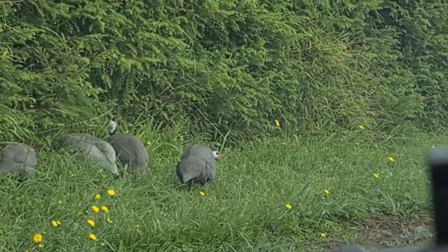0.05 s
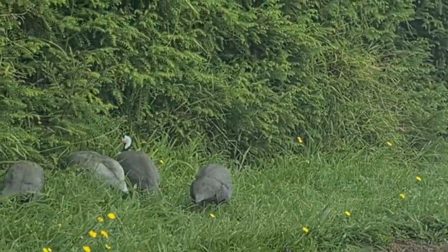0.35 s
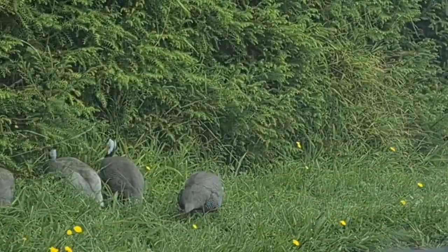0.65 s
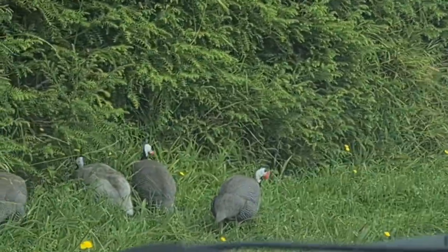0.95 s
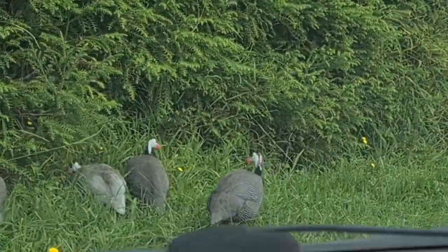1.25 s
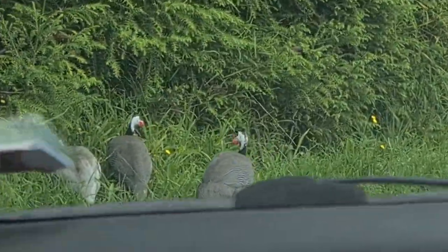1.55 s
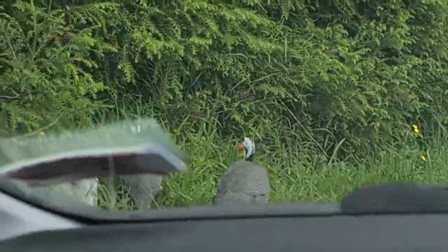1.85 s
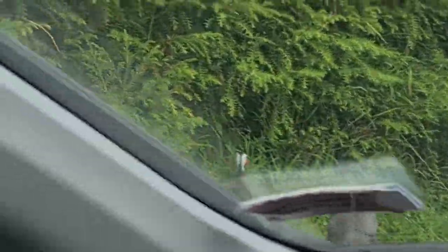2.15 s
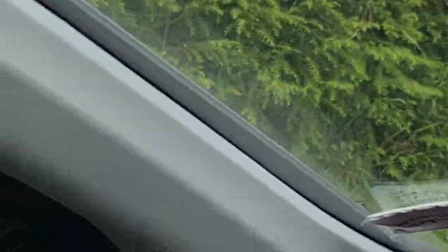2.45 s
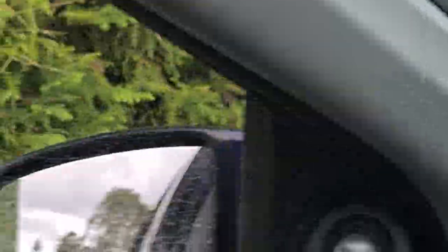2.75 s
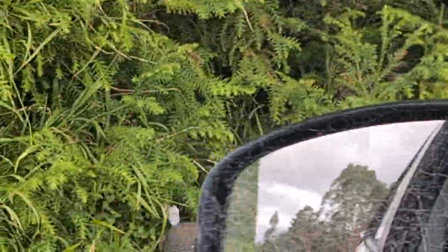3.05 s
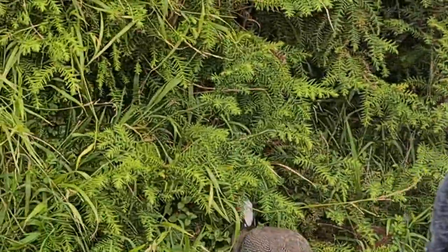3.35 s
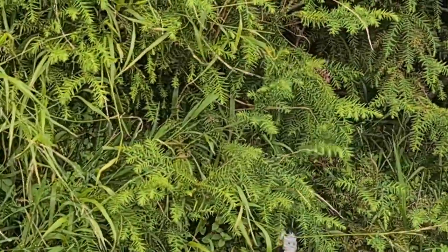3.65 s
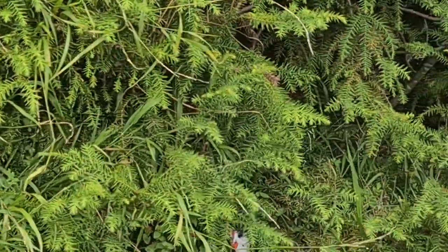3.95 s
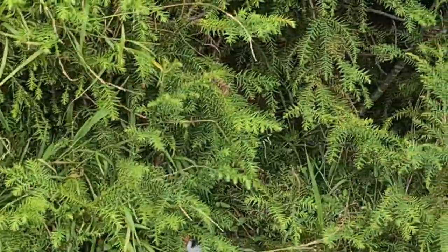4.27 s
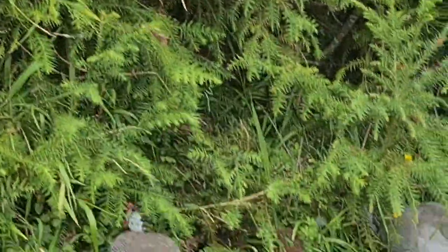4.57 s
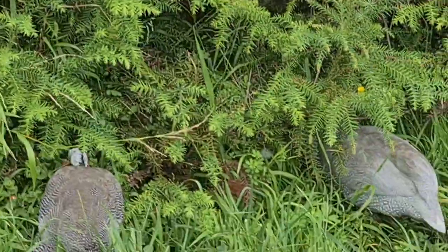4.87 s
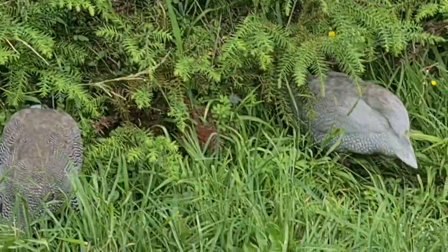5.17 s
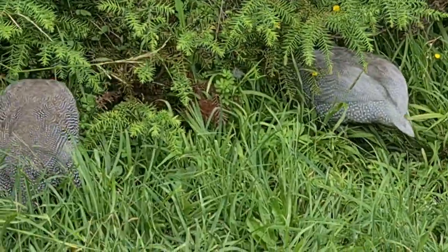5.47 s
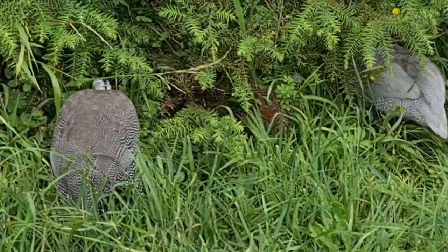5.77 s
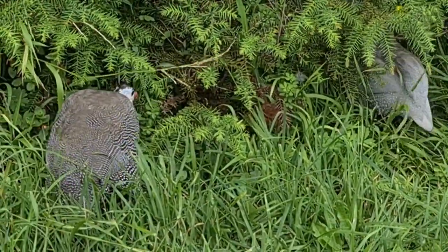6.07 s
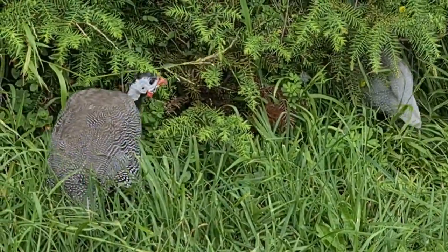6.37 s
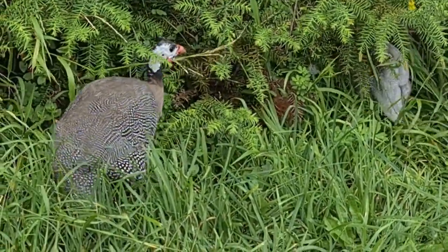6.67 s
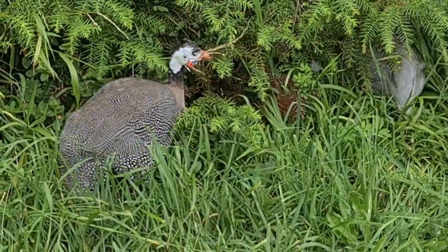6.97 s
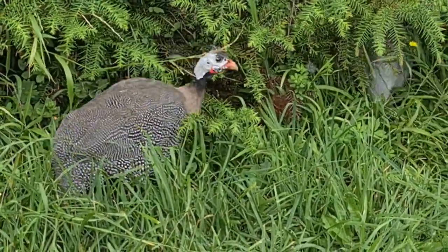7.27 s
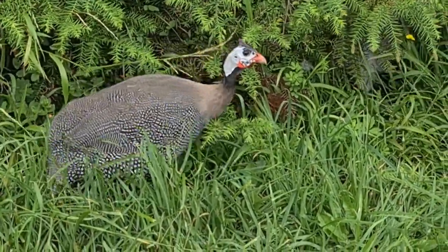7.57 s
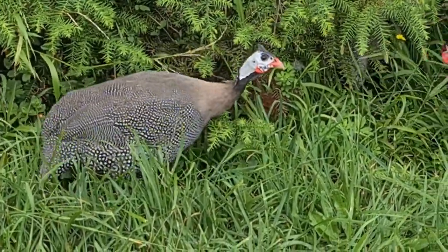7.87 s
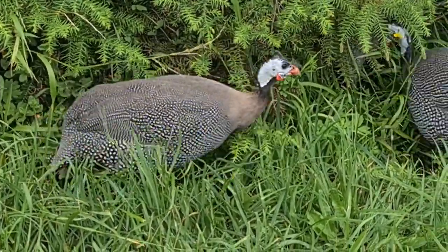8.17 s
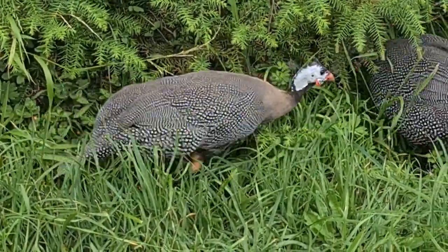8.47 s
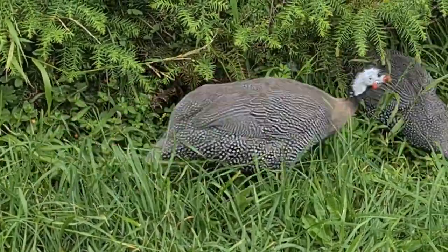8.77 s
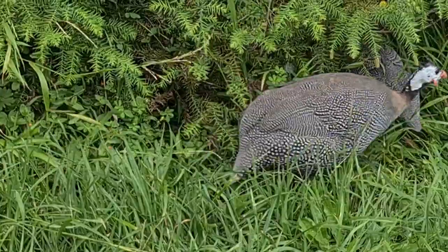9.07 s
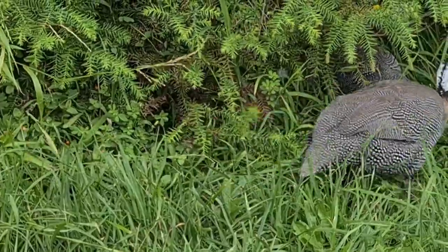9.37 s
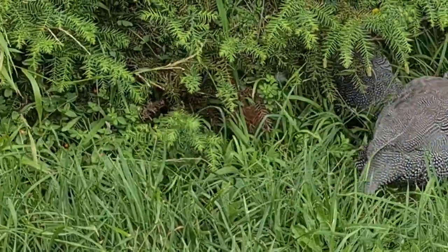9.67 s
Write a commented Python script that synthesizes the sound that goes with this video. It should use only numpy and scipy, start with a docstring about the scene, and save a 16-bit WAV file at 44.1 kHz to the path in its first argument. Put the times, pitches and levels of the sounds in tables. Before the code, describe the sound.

Guinea fowl give short, high clucks, whistles and buzzy trills over the low drone of a car slowing to an idle.

```python
"""Guinea fowl forage along a hedge, heard through the open window of a car that rolls to a stop and idles.
The syrinx of each bird is a modulated oscillator, giving arched clucks, thin whistles, buzzy trills
and hoarse sweeps, which the hedge reflects. Harmonics of the engine's firing rate drone in the cabin;
trim clicks, something squeaks, and blows on the body set the cabin air booming. Tyre noise and sway
fade as the car slows, and grass rustles faintly over a steady rumble and the open air."""
import sys
import numpy as np
from scipy import signal
from scipy.fft import rfft, irfft, next_fast_len
from scipy.io import wavfile
from scipy.ndimage import map_coordinates

SR = 44100
rng = np.random.default_rng(int(sys.argv[2]) if len(sys.argv) > 2 else 0)


def to_wav(sig):
    """Store sig (one row per channel, or 1-D mono) as 16-bit WAV at the path in sys.argv[1].

    Samples outside -1..1 are clipped; the rate is SR.
    """
    pcm = np.clip(np.atleast_2d(sig), -1, 1) * 32767
    pcm = np.round(pcm).astype(np.int16)
    wavfile.write(sys.argv[1], SR, pcm.T)  # frames by channels


N = 433062

# pitch arches: apex_s, fall_s, top_hz, end_hz, rise_db, accent_db, undertone_db, rasp_fraction
CLUCK_CALLS = [(1.755, 0.013, 4200, 3078, -61, -19, -52, 0), (2.800, 0.014, 4420, 3296, -37, -13, -60, .12),
               (3.174, .015, 3785, 2846, -54, -24, -32.5, 0.33),
               (3.375, .015, 4270, 3100, -41.5, -20, -58, 0),
               (4.041, 0.014, 4452, 3125, -37.5, -22.5, -66.5, 0.12),
               (4.668, 0.013, 4239, 3263, -34, -11, -23, 0.29),
               (5.450, 0.01, 3850, 2800, -41.5, -32, -47, 0.7),
               (6.008, .014, 4380, 3360, -36, -11, -34.5, 0.64),
               (6.396, .0164, 4270, 2950, -37, -24.5, -70, .25),
               (6.981, 0.014, 3650, 3360, -31, -36, -76, 0),
               (7.312, .016, 3906, 2740, -26.5, -18, -60, 0.1),
               (8.211, 0.011, 4292, 3063, -37, -19, -63, 0),
               (9.796, .0113, 3900, 2963, -54.5, -27.5, -69.5, 0)]
# contact notes: start_s, length_s, level_db, start_hz, one_third_hz, two_thirds_hz, end_hz
WHISTLE_CALLS = [(1.124, 0.036, -44.5, 3760, 3900, 3883, 4030), (2.0, .125, -53, 2877, 2890, 2830, 2940),
                 (3.198, 0.13, -48, 2840, 2870, 2860, 3000), (4.447, 0.12, -49.5, 3020, 3030, 3080, 3066),
                 (5.163, 0.2, -44, 1860, 2340, 2206, 2310), (5.165, 0.089, -64, 5450, 5530, 5520, 5540),
                 (5.441, 0.058, -47, 3780, 3900, 3840, 3840), (6.377, 0.047, -29, 2270, 2470, 2620, 2842),
                 (7.325, 0.071, -46, 2710, 2700, 2670, 2730), (9.465, .025, -48, 1980, 2030, 2050, 2030),
                 (9.505, 0.11, -39.5, 2340, 2408, 2473, 2360), (9.555, .0334, -52, 3000, 3350, 3300, 3200)]
# buzzy calls: start_s, length_s, centre_hz, trill_rate_hz, level_db
TRILL_CALLS = [(.01, 0.067, 3780, 170, -54.5), (0.54, .1, 4000, 170, -61), (0.705, 0.087, 3680, 171, -45),
               (0.765, 0.11, 3620, 173, -47.5), (2.16, .2, 3570, 169, -50),
               (2.487, 0.087, 3510, 220, -37.5), (3.262, .056, 3570, 170, -54),
               (3.574, 0.34, 3840, 172, -54), (5.152, .133, 3640, 168.5, -53),
               (5.592, 0.078, 3680, 161, -36), (7.572, 0.072, 3160, 249.4, -31)]
# soft calls that flick up or down: start_s, length_s, from_hz, to_hz, level_db
SWEEP_CALLS = [(1.232, 0.02, 3870, 2782, -46), (1.281, 0.051, 4220, 2750, -43),
               (1.520, .0304, 3997, 2620, -48.5), (1.961, .0287, 2590, 5200, -38.5),
               (1.983, 0.02, 4980, 2520, -38.5), (2.316, .016, 2400, 4700, -47),
               (3.021, 0.037, 2510, 4810, -41.5), (3.062, .0215, 4251, 3149, -44),
               (3.121, 0.021, 2768, 4414, -49.5), (4.345, 0.064, 4880, 3694, -50.5),
               (7.263, .0461, 2430, 5180, -34.5), (8.482, 0.024, 2210, 4576, -25),
               (8.528, .0109, 4410, 2490, -35), (9.612, 0.029, 2360, 5110, -33),
               (9.643, 0.015, 4700, 2266, -29.5)]
# resonance of the throat and bill: frequency_hz, gain_db
BILL_RESONANCE = [(2000, -25), (2600, -5.5), (3200, 3), (3900, -6), (4500, -7), (5200, -15.5)]
# reverberation of the hedge: frequency_hz, t60_s
HEDGE_DECAY = [(300, .15), (3000, 0.27), (10000, 0.059)]
# engine speed: time_s, firing_rate_hz
ENGINE_SPEED = [(0, 29.17), (1.1, 28.5), (2, 25.3), (3.4, 23.56), (5.4, 23.47), (6.9, 23.95), (7.5, 25.11),
                (8.3, 23.83), (9.82, 23.68)]
# shaking of the car by the first engine order: firing_rate_hz, level_db
SHUDDER_LEVELS = [(23.5, -33.5), (24.2, -37), (25, -25), (26, -23.5), (28, -18), (29.5, -21)]
# cabin drone: time_s, second_order_db, higher_orders_db
DRONE_LEVELS = [(0, -23.5, -32.5), (2, -26.5, -30), (4.5, -26, -26), (6.6, -23, -24.5), (7.6, -22, -27.5),
                (8.4, -22, -21), (9.82, -21.5, -21)]
# higher engine harmonics: order, relative_db
HIGHER_ORDERS = [(3, -11), (4, -25.5), (5, -23), (6, -18.5), (7, -25.5), (8, -27.5), (9, -34), (10, -38),
                 (15, -37)]
# engine whines: pitch_hz, relative_db
WHINE_TONES = [(1062, -1), (4900, -15.5)]
# motion of the slowing car: time_s, motion_db
CAR_MOTION = [(0, -3), (1.2, -0.5), (2.9, -4), (3.7, -11.5), (5.4, -15.5)]
# blows on the body: start_s, level_db, boom_hz, panel_relative_db
BODY_BLOWS = [(1.525, -23, 245, 0), (1.565, -13, 91.4, -10.5), (1.605, -19, 192, -13), (5.435, -12, 76, -1),
              (5.460, -6, 59.9, -8)]
# clicks of the trim: start_s, level_db, knock_relative_db, snap_relative_db
TRIM_CLICKS = [(1.0743, -20.5, -12, -7.5), (2.521, -37, -10, -0.5), (3.4128, -28, 8.5, -9),
               (3.4964, -32, 16, -40), (5.6146, -52.5, 20.5, 6.5), (6.2706, -41.5, 6.5, -25),
               (6.9159, -44, 12, -26), (9.0256, -42, -5, 1)]
# partials of the squeak: pitch_hz, relative_db
SQUEAK_PARTIALS = [(1115, 3.5), (2290, -11.5), (3400, -13), (4000, -7.5), (5500, -23.5)]
# swells of rustling grass: middle_s, length_s, level_db
GRASS_BURSTS = [(1.193, .2, -62), (1.65, 0.29, -64.5), (2.354, .15, -70), (2.825, 0.14, -67.5),
                (4.382, 0.14, -65.5), (5.1, .12, -66), (5.7, 0.22, -68), (6.52, .2, -66),
                (6.88, 0.41, -67.5), (7.352, 0.18, -68.5), (7.716, 0.22, -69), (8.684, 0.068, -62),
                (8.873, 0.23, -58), (9.25, 0.39, -64.5)]
# noise spectra, each named for its source: frequency_hz, relative_db
SWAY_SPECTRUM = [(10, -20.5), (27, 5.5), (40, 7), (60, 9.5), (85, -5.5), (200, -36.5), (600, -120)]
TYRE_SPECTRUM = [(100, -14.5), (170, -1), (230, -4.5), (350, 1), (520, -13.5), (720, -8.5), (950, -17),
                 (1260, -16), (1600, -20.5), (4000, -46.5)]
PANEL_SPECTRUM = [(30, 5), (65, -4.5), (150, -4.5), (240, -13), (400, -16), (620, -19), (900, -36.5),
                  (1400, -40), (3000, -50), (8000, -95)]
GRASS_SPECTRUM = [(1500, -26.5), (4000, -3), (6800, 3), (8000, -2.5), (9500, 0.5), (12000, 0),
                  (15800, -4.5)]
CABIN_SPECTRUM = [(40, -28), (80, 3), (130, 4), (200, -16.5), (300, -19.5), (900, -79)]
AIR_SPECTRUM = [(120, -29.5), (200, -3.5), (268, -5.5), (366, -5.5), (447, -9), (788, -15), (945, -21.5),
                (1070, -19.5), (1700, -24.5), (4810, -27.5), (7190, -39.5), (8020, -53), (9280, -41.5),
                (14700, -53), (15800, -53)]
KNOCK_SPECTRUM = [(100, -38), (400, 3), (1000, 0.5), (1800, -34), (5000, -77.5)]
TICK_SPECTRUM = [(700, -32), (1400, -3), (1700, -9.5), (2100, 1.5), (2600, -4.5), (4500, -17.5),
                 (8000, -38)]
SNAP_SPECTRUM = [(1000, -34), (3500, 11.5), (6000, 4), (7800, -1), (8700, 5.5), (11000, -5.5),
                 (15000, -10)]
SCRAPE_SPECTRUM = [(900, -17), (2300, -2), (3500, 0), (5600, -15), (7000, -34.5)]
# likeness of left and right noise: frequency_hz, correlation
STEREO_COHERENCE = [(60, 0.99), (150, 0.9), (300, 0.68), (1000, 0.056), (4000, 0.054), (10000, 0.039)]
# uneven treble with a dip at 8 kHz: frequency_hz, gain_db
TREBLE_COLOUR = [(5000, 1.5), (6000, 7), (7000, -1), (7500, -2.5), (8000, -12), (8600, 3), (10000, -0.5)]


def clucks(rise_s=0.0145, start_hz=3297, hold_s=0.0018, release_s=0.0084, break_s=0.0061, dip_db=3,
           scatter_hz=650, shake_db=1.8, second_db=-20.5, third_db=-38, upper_ratio=1.4,
           under_ratio=0.545):
    """Oscillation of the syrinx: the pitch arches, falls into an accent, then may break into a rasp."""
    out = np.zeros(N)
    for apex_s, fall_s, top_hz, end_hz, rise_db, accent_db, under_db, rasp in CLUCK_CALLS:
        fade_s = fall_s + hold_s
        t = np.arange(-rise_s * 1.4, fade_s + 3 * release_s, 1 / SR)
        up_hz = start_hz + (top_hz - start_hz) * np.cos(np.pi / 2 * t / rise_s)
        down_hz = end_hz + (top_hz - end_hz) * np.cos(np.pi / 2 * np.minimum(t / fall_s, 1)) ** 2
        top_db = (rise_db + accent_db) / 2 - dip_db - (top_hz - 4000) * 0.0069  # thinner as it climbs
        envelope = [(-rise_s * 1.3, rise_db - 23.5), (-rise_s * 0.5, rise_db), (0, top_db),
                    (fall_s * 0.55, top_db + 3.5), (fall_s * 0.82, accent_db), (fade_s, accent_db),
                    (fade_s + release_s, accent_db - 15), (t[-1], accent_db - 54)]
        level_db = np.interp(t, *np.transpose(envelope))
        broken = rasp * np.clip((t - fall_s) / break_s, 0, 1)
        jitter_hz = (90 + scatter_hz * broken) * wobble(1500, len(t))
        phase = phase_of(np.where(t < 0, up_hz, down_hz) + jitter_hz)
        bright_db = (level_db - accent_db) * 0.5 + 14 * (rasp - 0.3)  # a strained accent is brightest
        overtones = amp(second_db) * np.sin(2 * phase) + amp(third_db) * np.sin(3 * phase)
        # a faint upper tone follows the cluck's pitch at a fixed ratio
        upper = amp(-27 - (level_db + 22) * 0.34).clip(0, 0.5) * np.sin(upper_ratio * phase)
        voice = np.sin(phase) + amp(bright_db) * overtones + upper
        flutter = amp(shake_db * wobble(500, len(t))) * (1 + 1.6 * broken * wobble(2000, len(t)))
        crack = amp(under_db) * np.exp(-((t - fall_s - 0.01) / 0.008) ** 2)
        undertone = crack * np.sin(under_ratio * phase)  # the voice cracks nearly an octave down
        add(out, apex_s + t[0], amp(level_db) * voice * flutter + undertone)
    return out


def whistles(waver_hz=26, shake_db=3.2):
    """Near-pure tones glide through four pitches; random modulation makes them waver and break up."""
    out = np.zeros(N)
    for start_s, length_s, level_db, *pitches in WHISTLE_CALLS:
        progress = np.linspace(0, 1, int(length_s * SR))
        glide_hz = map_coordinates(np.array(pitches, float), [progress * 3], mode="nearest")
        tone = np.sin(phase_of(glide_hz + waver_hz * wobble(130, len(progress))))
        gain = amp(level_db + shake_db * wobble(90, len(progress)))
        add(out, start_s, gain * arch(progress) ** 0.5 * tone)
    return out


def trills(swing_scale_hz=537, roughness=0.18, uneven_db=2.5):
    """Fast frequency and amplitude modulation gives a soft tone sidebands, heard as a buzz."""
    out = np.zeros(N)
    for start_s, length_s, centre_hz, rate_hz, level_db in TRILL_CALLS:
        size = int(length_s * SR)
        beat = phase_of(rate_hz * (1 + 0.28 * wobble(100, size)))
        swing = 0.88 * np.sin(beat) + roughness * wobble(1182, size) + 0.48 * wobble(50, size)
        tone = np.sin(phase_of(centre_hz + swing_scale_hz * swing))
        gain = amp(level_db + uneven_db * wobble(70, size))
        swell = arch(np.linspace(0, 1, size) ** 0.69) ** 1.47
        add(out, start_s, gain * swell * (1 + 0.6 * np.cos(beat)) * tone)
    return out


def sweeps(hoarse_hz=180, shake_db=3.2, second_db=-27):
    """Source and filter: a hoarse glide is loudest where it crosses the resonance of the bill."""
    out = np.zeros(N)
    for start_s, length_s, from_hz, to_hz, level_db in SWEEP_CALLS:
        progress = np.linspace(0, 1, int(length_s * SR))
        pitch_hz = from_hz + (to_hz - from_hz) * progress
        phase = phase_of(pitch_hz + hoarse_hz * wobble(1488, len(progress)))
        gain = amp(level_db + along(BILL_RESONANCE, pitch_hz) + shake_db * wobble(474, len(progress)))
        voice = np.sin(phase) + amp(second_db) * np.sin(2 * phase)
        add(out, start_s, gain * arch(progress) ** 0.5 * voice)
    return out


def from_left(x, lead_s=0.00025, left_db=2.3):
    """Time and level cues to direction: the birds arrive earlier and louder on the left."""
    return filtered(x, lambda hz: np.exp(1j * np.pi * hz * lead_s * np.array([[1], [-1]]))) * pan(left_db)


def reflections(x, frame_db=-12, frame_t60_s=0.066, hedge_db=-24, echo_db=-29.5, echo_s=0.051):
    """Convolution adds early reflections off the window frame, a leafy tail and an echo from trees."""
    hz, t, spectra = signal.stft(rng.standard_normal((2, SR // 2)), SR, nperseg=256)
    hedge = signal.istft(spectra * decay(t, along(HEDGE_DECAY, hz)[:, None]), SR, nperseg=256)[1]
    t = np.arange(hedge.shape[1]) / SR
    frame = rng.standard_normal(hedge.shape) * decay(t, frame_t60_s) * (t > 0.002)
    echo = rng.standard_normal(hedge.shape) * np.exp(-((t - echo_s) / 0.017) ** 2)
    paths = [(frame_db, frame), (hedge_db, hedge), (echo_db, echo)]
    response = sum(amp(db) * path / np.linalg.norm(path[0]) for db, path in paths)
    return signal.fftconvolve(x, response, axes=1)[:, :N]


def engine_drone():
    """Periodic firing drives the cabin at whole multiples of its rate, the engine orders."""
    rate_hz, = curves(ENGINE_SPEED)
    second_db, higher_db = curves(DRONE_LEVELS)
    phase = phase_of(rate_hz * (1 + 0.0036 * wobble(12)))
    orders = [(1, along(SHUDDER_LEVELS, rate_hz) + 0.99 * wobble(10)), (2, second_db)]
    orders += [(order, higher_db + db + 1.79 * wobble(8.8)) for order, db in HIGHER_ORDERS]
    drone = sum(amp(db) * np.sin(order * phase + rng.uniform(0, 2 * np.pi)) for order, db in orders)
    return np.sqrt(2) * drone * pan(-1.83)


def engine_whine(start_s=3.1, fade_in_s=0.13, level_db=-64, swell_db_per_s=0.97, waver=0.012, hiss_db=-5):
    """Two wavering tones in narrow-band noise set in as the car stops, then slowly swell."""
    whine = 0
    for hz, db in WHINE_TONES:
        tone = np.sin(phase_of(hz * (1 + waver * wobble(90))))
        hiss = noise([(hz * 0.75, -100), (hz * 0.95, -20), (hz, 0), (hz * 1.05, -20), (hz * 1.3, -100)])
        whine += amp(db) * (tone + amp(hiss_db) * hiss)
    age_s = np.arange(N) / SR - start_s
    return amp(level_db + swell_db_per_s * age_s) * np.clip(age_s / fade_in_s, 0, 1) * whine


def rolling(sway_db=-23, tyres_db=-44, bumpy_db=2):
    """Forced vibration: bumpy ground sways the body and the tyres murmur, less as the car slows."""
    motion_db, = curves(CAR_MOTION)
    sway = amp(sway_db + bumpy_db * wobble(7)) * noise(SWAY_SPECTRUM) * pan(-1.3)
    return amp(motion_db) * (sway + amp(tyres_db) * noise(TYRE_SPECTRUM))


def body_thuds(panel_t60_s=0.15, t60_at_65_hz_s=0.55, attack_s=0.0013):
    """Damped resonance: soft blows shake the body panels and set the cabin air booming."""
    out, t = np.zeros((2, N)), np.arange(SR // 2) / SR
    for start_s, level_db, boom_hz, panel_db in BODY_BLOWS:
        panel = amp(panel_db) * decay(t, panel_t60_s) * noise(PANEL_SPECTRUM, len(t))
        boom = decay(t, t60_at_65_hz_s * 65 / boom_hz) * np.sin(2 * np.pi * boom_hz * t)
        add(out, start_s, amp(level_db) * (panel + boom) * (1 - np.exp(-t / attack_s)))
    return out


def trim_clicks(knock_t60_s=0.089, tick_t60_s=0.059, snap_t60_s=0.09, attack_s=0.00045):
    """Transients in plastic trim decay exponentially: a dull knock, a tick and a bright snap."""
    out, t = np.zeros((2, N)), np.arange(SR // 4) / SR
    for start_s, level_db, knock_db, snap_db in TRIM_CLICKS:
        knock = amp(knock_db - 3.5) * decay(t, knock_t60_s) * noise(KNOCK_SPECTRUM, len(t))
        tick = decay(t, tick_t60_s) * noise(TICK_SPECTRUM, len(t))
        snap = amp(snap_db) * decay(t, snap_t60_s) * noise(SNAP_SPECTRUM, len(t))
        add(out, start_s, amp(level_db - 6.5) * (knock + tick + snap) * (1 - np.exp(-t / attack_s)))
    return out


def squeak(time_s=3.711, level_db=-29, swell_s=0.009, scrape_db=-7):
    """Inharmonic partials with pitch jitter, over scraping noise, make one short, harsh squeak."""
    out, t = np.zeros((2, N)), np.arange(SR // 8) / SR
    tone = sum(amp(db) * np.sin(phase_of(hz * (1 + 0.019 * wobble(720, len(t)))))
               for hz, db in SQUEAK_PARTIALS)
    scrape = amp(scrape_db) * noise(SCRAPE_SPECTRUM, len(t))
    envelope = (t / swell_s) ** 2 * np.exp(2 - 2 * t / swell_s)
    add(out, time_s - swell_s / 2, amp(level_db) * envelope * (tone + scrape))
    return out


def grass(floor_db=-71.5, spiky_db=1.3, uneven_db=1.2):
    """Incoherent rustles add in power: short spiky bursts rise over a faint floor."""
    t = np.arange(N) / SR
    burst_power = sum(amp(db) ** 2 * np.exp(-(2 * (t - middle_s) / length_s) ** 2)
                      for middle_s, length_s, db in GRASS_BURSTS)
    rustle = unit_rms(noise(GRASS_SPECTRUM) * amp(spiky_db * wobble(250) + uneven_db * wobble(22)))
    return np.sqrt(amp(floor_db) ** 2 + burst_power) * rustle * pan(-10)


def rumble_and_air(rumble_db=-39, air_db=-47.5):
    """Nearly stationary noise: a low rumble in the cabin and the broad hush of open air."""
    rumble = amp(rumble_db + 1.1 * wobble(4)) * noise(CABIN_SPECTRUM)
    return rumble + amp(air_db + 0.37 * wobble(6)) * noise(AIR_SPECTRUM)


def noise(spectrum, size=N):
    """Partly coherent stereo noise of rms 1, nearly mono in the bass."""
    def mid_side_gains(hz):
        angle = np.arccos(along(STEREO_COHERENCE, hz)) / 2
        return amp(along(spectrum, hz)) * [np.cos(angle), np.sin(angle)]
    mid, side = filtered(rng.standard_normal((2, size)), mid_side_gains)
    return unit_rms(np.array([mid + side, mid - side]))


def amp(db):
    """Decibels to gain."""
    return 10 ** (np.asarray(db) / 20)


def decay(t, t60_s):
    """Exponential fall of 60 dB in t60_s."""
    return amp(-60 * t / t60_s)


def arch(progress):
    """Half a sine as progress runs from 0 to 1."""
    return np.abs(np.sin(np.pi * progress))


def unit_rms(x):
    """Scale to rms 1."""
    return x / np.sqrt(np.mean(x ** 2) + 1e-20)


def along(points, hz):
    """Interpolate on a logarithmic frequency axis."""
    knots_hz, values = np.transpose(points)
    return np.interp(np.log(hz + 1), np.log(knots_hz + 1), values)


def curves(rows):
    """One value per sample for each column after the time."""
    time_s, *columns = np.transpose(rows)
    return [np.interp(np.arange(N) / SR, time_s, column) for column in columns]


def wobble(rate_hz, size=N):
    """A smooth random curve, rate_hz knots a second."""
    knots = rng.standard_normal(int(size * rate_hz / SR) + 4)
    return map_coordinates(knots, [np.arange(size) * rate_hz / SR])


def phase_of(hz):
    """Phase in radians, the integral of frequency."""
    return 2 * np.pi * np.cumsum(hz) / SR


def filtered(x, response):
    """Multiply the spectrum by a frequency response."""
    size = x.shape[-1]
    padded = next_fast_len(size + 8192)
    return irfft(rfft(x, padded) * response(np.fft.rfftfreq(padded, 1 / SR)), padded)[..., :size]


def add(track, start_s, sound):
    """Superpose a sound on a track."""
    part = track[..., max(0, round(start_s * SR)):][..., :sound.shape[-1]]
    part += sound[..., :part.shape[-1]]


def pan(left_db):
    """Channel gains, the left above the right by left_db."""
    return amp([[left_db / 2], [-left_db / 2]])


def scene(soft_direct_db=-2, soft_reflected_db=5):
    """Superposition of birds, car and background; the soft calls carry more reflected sound."""
    loud = from_left(clucks() + whistles()) + squeak() + trim_clicks()
    soft = from_left(sweeps() + trills())
    direct = loud + amp(soft_direct_db) * soft
    reflected = reflections(loud + amp(soft_reflected_db) * soft)
    foreground = filtered(direct + reflected, lambda hz: amp(along(TREBLE_COLOUR, hz)))
    car = engine_drone() + engine_whine() + rolling() + body_thuds()
    return foreground + car + grass() + rumble_and_air()


def record(dry):
    """An ideal low-pass filter removes everything above 15.8 kHz."""
    return filtered(dry, lambda hz: hz < 15800)


dry = scene()
out = record(dry)
to_wav(out)
```